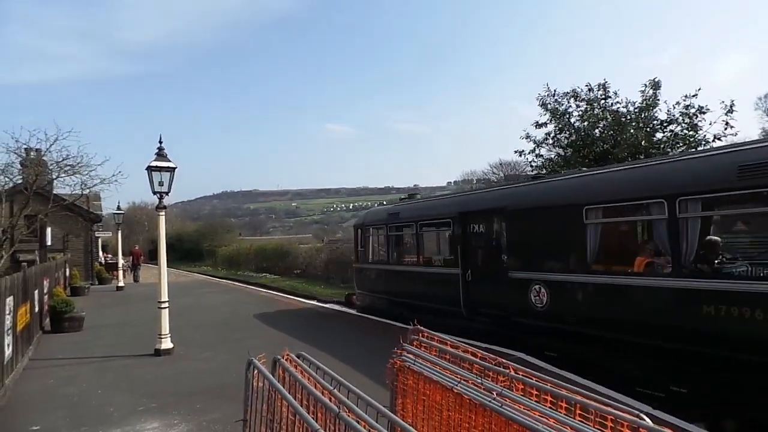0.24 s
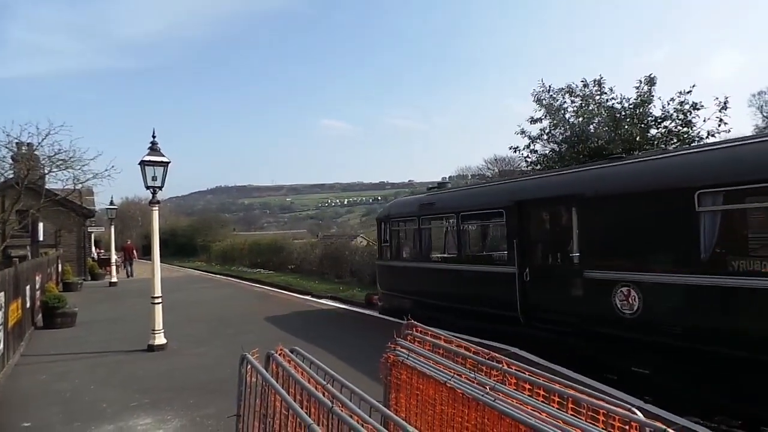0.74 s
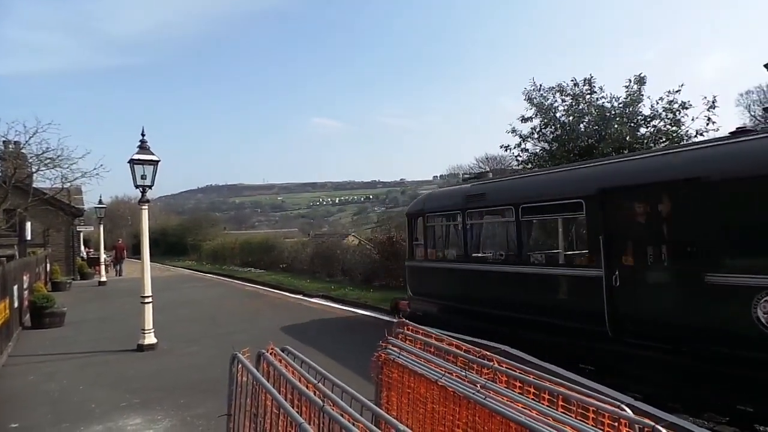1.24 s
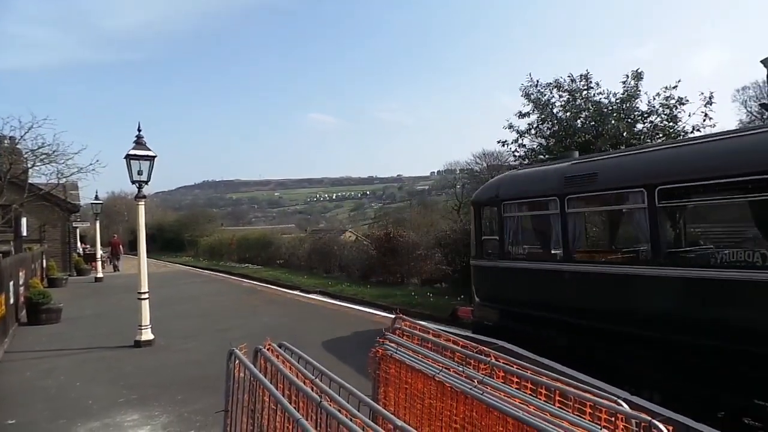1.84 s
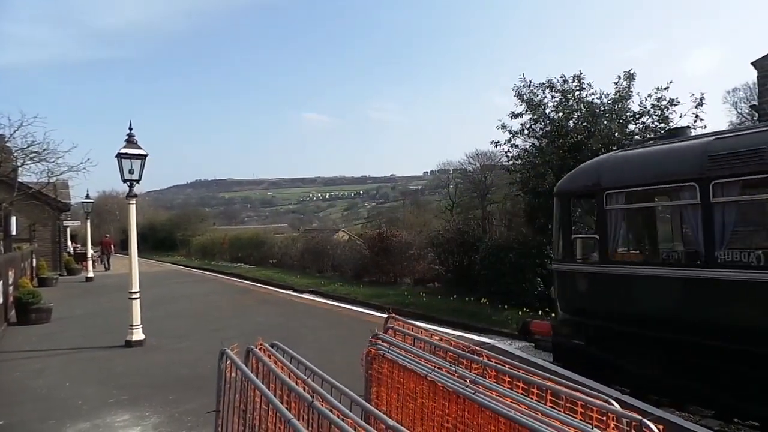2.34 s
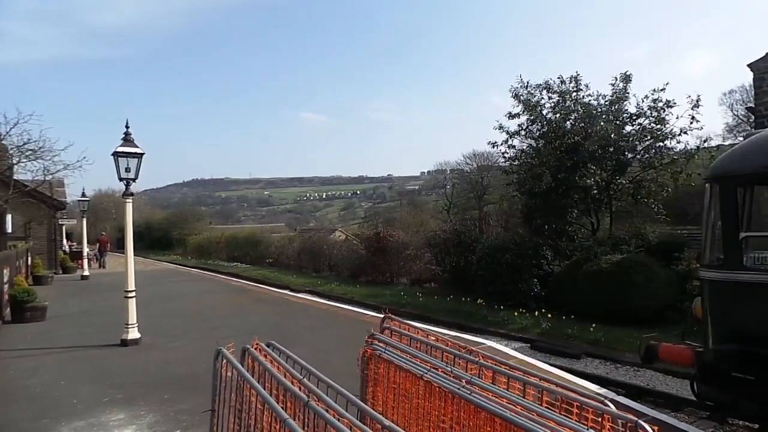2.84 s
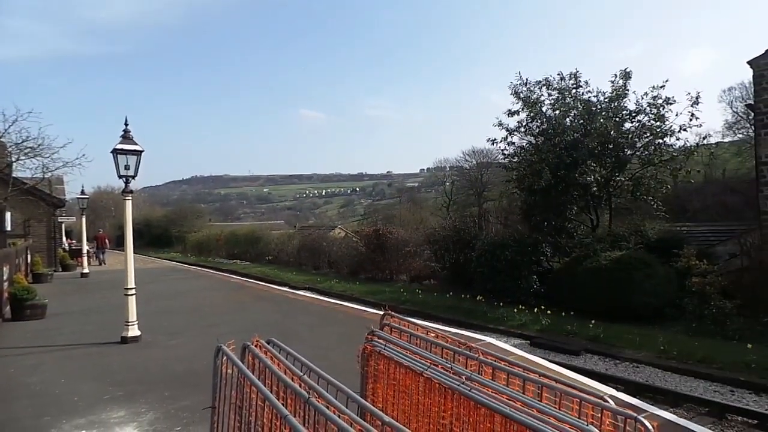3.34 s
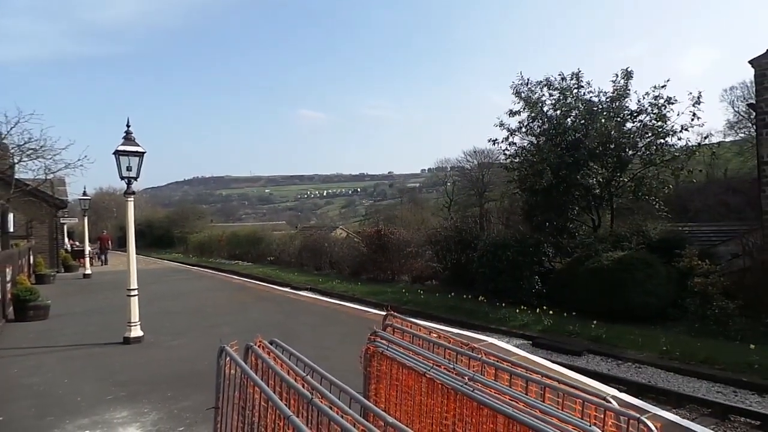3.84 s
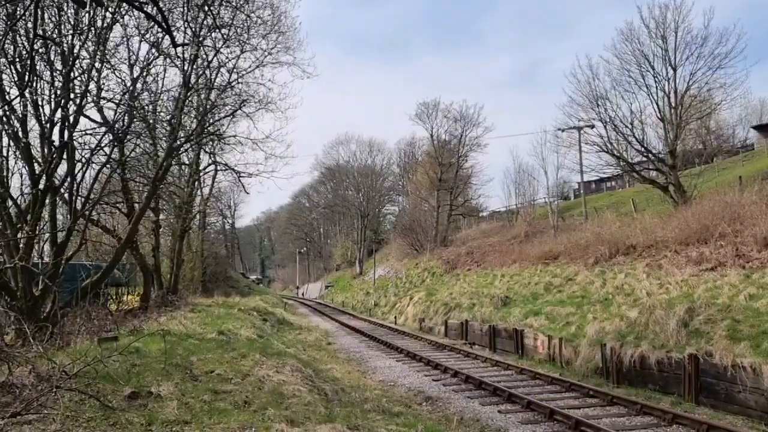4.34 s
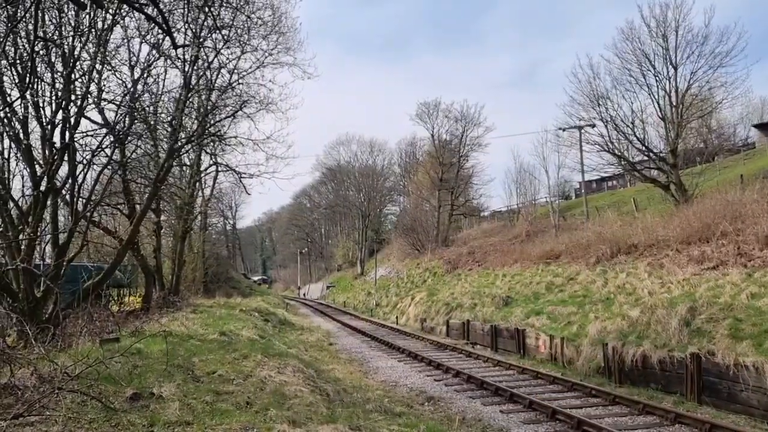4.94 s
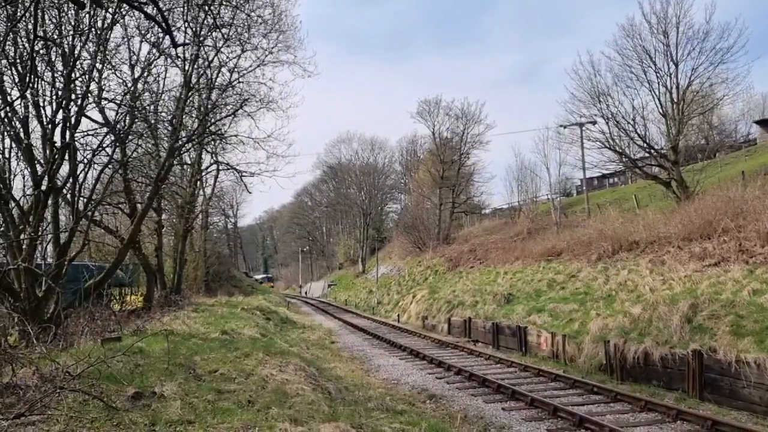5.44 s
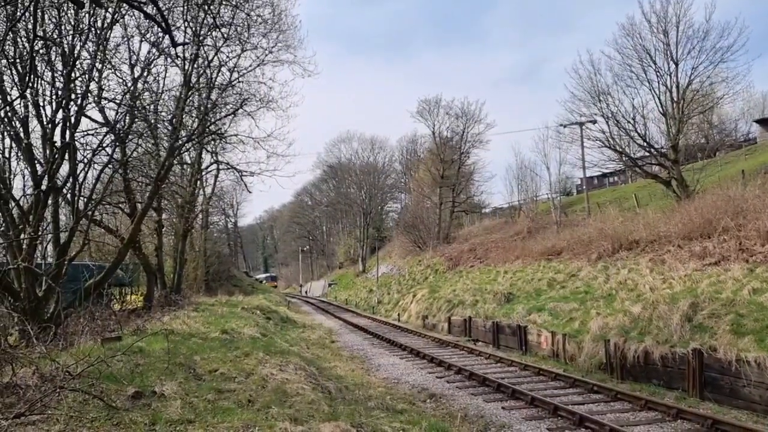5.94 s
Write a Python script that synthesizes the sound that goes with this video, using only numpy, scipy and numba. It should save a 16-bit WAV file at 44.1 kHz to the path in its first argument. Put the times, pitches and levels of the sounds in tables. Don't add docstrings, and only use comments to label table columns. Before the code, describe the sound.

From the start a diesel railcar is loud and close beside an open station platform. Deep exhaust thuds, about 45 per second, climb steadily to about 68 by 3.5 s, with knocking block resonances and rough, broad rolling noise. Joints and loose panels jolt irregularly; wheels ring around 700 Hz in short surges, strongest after 2.4 s. A blurred fan whine near 1.2 kHz peaks around 2 s. From 2.75 s a gear drone near 220 Hz joins, strongest around 3.4 s; roar peaks near 3.4 s and eases by 4 s. At 4.1 s the train cuts off. After a tiny gap comes a far quieter lineside: soft bassy breeze, faint throbbing engine hum, four high descending chirps until 4.7 s, a raspy far call at 4.3-4.5 s, and sparse echoing whistles until 6 s. Small snaps fall at 4.4 and 6 s, a dull knock at 5.5 s.

```python
import sys
import numpy as np
from scipy import signal
from scipy.fft import rfft, irfft
from scipy.io import wavfile
from scipy.ndimage import uniform_filter1d
from numba import njit

SR = 44100
rng = np.random.default_rng(int(sys.argv[2]) if len(sys.argv) > 2 else 0)


def master(y):
    cut = np.clip(np.atleast_2d(y).T, -1, 1)
    pcm = np.round(cut * 32767)
    wavfile.write(sys.argv[1], SR, pcm.astype(np.int16))


def convert_level_to_amplitude(level_db):
    exponent = np.asarray(level_db, float) / 20
    return 10 ** exponent


N = 273420
T = np.arange(N) / SR

# (fade out start [s], fade out end [s], fade in start [s], fade in end [s])
CUT_S = (4.108, 4.127, 4.149, 4.16)
# (frequency [Hz], density [dB per Hz])
AIR_SPECTRUM = [(15, -36), (25, -6), (48, 0), (76, 7), (113, -11.5), (160, -14.5), (257, -23.5), (326, -18),
                (569, -26), (741, -22), (1130, -32), (1330, -29.5), (2860, -34), (11300, -60.5),
                (14000, -82)]
# (time [s], level [dB])
BREEZE = [(4.17, -0.5), (4.9, -3), (5.2, -4), (5.45, 0.3), (5.9, 0.2), (6.2, -1.5)]
# (time [s], pitch [Hz], level [dB])
HUM = [(4.17, 53.84, -56), (4.3, 58, -47), (4.45, 64.4, -63), (4.58, 64.2, -48), (5.1, 65.9, -51),
       (5.25, 60.8, -61.5), (5.4, 61.1, -52), (5.6, 61.5, -57), (5.9, 63.6, -51), (6.06, 61.3, -59),
       (6.2, 74.6, -47)]
# (time [s], length [s], peak [dB])
CROAK = [
    (4.27, 0.16, -72.5),
    (4.335, .05, -65),
    (4.41, 0.057, -76),
    (4.54, .09, -70.5),
]
# (time [s], peak [dB], centre [Hz], width [Hz], decay [s])
SNAPS = [
    (4.158, -63, 2520, 400, .008),
    (4.3994, -57, 5100, 9000, .002),
    (5.485, -63, 1350, 260, 0.056),
    (5.9945, -61, 2596, 905, .004),
]
# (time [s], length [s], start [Hz], end [Hz], end level [dB])
CHIRPS = [
    (4.146, .066, 7500, 6380, -73),
    (4.284, 0.11, 7150, 6110, -64),
    (4.428, 0.13, 6950, 6050, -65),
    (4.599, 0.12, 7020, 6010, -67),
]
# (time [s], length [s], start [Hz], end [Hz], level [dB])
TICKS = [
    (5.142, .036, 7750, 6270, -73.5),
    (6, 0.059, 7720, 5900, -67.5),
]
# (time [s], length [s], start [Hz], end [Hz], level [dB])
WHISTLES = [(4.253, 0.043, 1660, 1600, -63), (4.341, .06, 1710, 1680, -70), (4.408, .11, 1700, 1604, -68),
            (4.555, .03, 1610, 1610, -65), (4.606, 0.054, 1990, 1910, -70), (4.655, .04, 1630, 1610, -71),
            (4.905, 0.077, 2080, 2440, -72), (4.967, 0.15, 2430, 2480, -69.5),
            (5.087, .13, 2380, 2450, -75), (5.33, 0.049, 2070, 2085, -70), (5.428, .05, 2700, 2610, -68),
            (5.616, .08, 2650, 2690, -73), (5.715, 0.049, 2295, 2250, -72), (5.79, 0.036, 2190, 2130, -61),
            (5.835, .035, 2150, 2150, -66), (5.865, 0.12, 2065, 2065, -71.5)]
# (time [s], centre [Hz], level [dB])
FAN = [(0, 1110, -45), (1, 1190, -33), (1.5, 1227, -26), (2, 1270, -24), (2.6, 1308, -26.5),
       (3, 1377, -33.5), (4.13, 1330, -40)]
# (time [s], level against the pass [dB], dullness [dB])
NEARNESS = [(0, -8, 3), (.3, -5, 0.5), (.55, -7, 1.5), (.9, -2.5, 1), (1.2, -2, 2), (1.8, -1, 2),
            (2.5, 0, 2.5), (3.35, 1, 3), (3.72, -1.5, 2.5), (3.9, -4, 3), (4.1, -6, 1.5)]
# (frequency [Hz], width [Hz])
WHEEL_MODES = [(731.4, 14), (678.5, 28)]
WHEEL_DB = [-30.5, -36]
# (time [s], length [s], peak [dB])
UPPER_RINGS = [(.44, 0.24, -37.5), (.73, 0.051, -24), (.84, .08, -27), (1.13, .14, -30), (1.4, .1, -26),
               (1.54, 0.051, -23), (1.64, 0.075, -24), (2.45, 0.14, -20.5), (2.55, 0.066, -31),
               (2.85, 0.25, -24.5), (3.03, 0.024, -30.5), (3.14, 0.18, -18), (3.3, 0.11, -42),
               (3.5, 0.1, -27), (3.6, 0.045, -21.5), (3.7, .12, -21)]
LOWER_RINGS = [(.73, 0.087, -35), (.87, 0.088, -38), (1.47, .2, -38), (2.0, 0.14, -41), (2.54, 0.097, -27),
               (2.9, 0.25, -38), (3.17, .12, -22.5), (3.42, 0.11, -26.5), (3.54, 0.05, -21.5),
               (3.62, 0.039, -24), (3.7, 0.062, -19), (3.85, 0.084, -25)]
# (frequency [Hz], width [Hz])
BLOCK_MODES = [(912, 90), (1876, 130), (756, 190), (338.4, 49), (1126, 140)]
BLOCK_DB = [-30.5, -33.5, -44, -32, -29.5]
# (time [s], length [s], peak [dB])
LOWER_SHUDDERS = [(.5, 0.083, -21.5), (.89, 0.28, -36), (1.28, 0.054, -33), (2.77, 0.082, -22),
                  (3.05, 0.14, -25.5), (3.36, 0.17, -18.5), (3.74, 0.16, -25.5)]
UPPER_SHUDDERS = [(1.33, 0.12, -25.5), (2.42, 0.37, -33.5), (3.05, 0.14, -32), (3.73, 0.14, -26.5)]
SUMP_SHUDDERS = [(.4, .6, -23.5), (.9, 0.57, -24.5), (3.6, .4, -31)]
FLOOR_SHUDDERS = [(1.9, 0.38, -28.5), (2.5, 0.44, -24), (2.95, 0.38, -21.5)]
AXLE_SHUDDERS = [(3.55, 0.23, -23.5), (3.7, 0.2, -32)]
# (frequency [Hz], density [dB per Hz])
ROAR_SPECTRUM = [(15, -42), (25, -21.5), (54, -11.5), (136, -4), (213, -4), (472, -11), (800, -9),
                 (1920, -17), (3100, -26.5), (8900, -34), (10200, -36), (11200, -36.5), (12500, -37.5),
                 (14400, -39)]
REGIONS_HZ = [420, 1100, 2300, 5500]
NEAR_SHARES = [0.54, 1.48, 1.06, 1.1]
DULL_SHARES = [1.1, 0.74, -0.025, -1.4]
# (time [s], length [s], treble lift [dB], bass lift [dB])
JOLTS = [(0.123, 0.037, 1, -5.5), (0.242, 0.082, 0.5, -1.5), (0.297, 0.044, -6, 0), (0.51, 0.11, 6, 0),
         (0.538, .04, -5, 1), (0.603, 0.076, 3, 1.5), (0.73, 0.017, 4.5, -2), (0.83, 0.064, 2.5, -1),
         (1.125, 0.07, -2.5, 0), (1.8, 0.035, 2.5, 1.5), (2.22, 0.11, 0.5, -0.5),
         (2.478, 0.022, -1.5, -4.5), (2.538, 0.013, 3, -2.5), (3.34, 0.041, -0.5, 1),
         (3.622, 0.025, 3.5, 0), (3.71, .05, 2, 2.5), (3.86, .03, 5.5, 0.5)]
# (time [s], pitch [Hz], level [dB])
GEAR = [(2.75, 213.5, -34), (3.0, 220.4, -26.5), (3.25, 226, -27), (3.4, 229.8, -20.5),
        (3.65, 232.3, -22.5), (3.9, 230.4, -25.5), (4.03, 222.4, -25.5), (4.1, 215.5, -38)]
# (time [s], length [s], peak [dB])
GEAR_UPPER = [
    (3.45, .5, -27.5),
]
# (time [s], firing rate [Hz], firing line level [dB], multiple favoured by echo, its lift [dB])
EXHAUST = [(0.0, 44.6, -17.5, 5.6, 9.5), (0.1, 46.5, -15.5, 5.6, 6), (0.25, 47.2, -15.5, 5.0, 9.5),
           (0.45, 48.73, -16, 4.3, 13), (0.72, 50.25, -19, 3.8, 19), (1.02, 52.56, -22.5, 3.3, 21.5),
           (1.24, 53.7, -19.5, 2.9, 19), (1.7, 57.2, -17.5, 2.4, 14.5), (2.0, 58.97, -16, 2.2, 8),
           (2.39, 61.53, -26, 2.1, 17.5), (2.8, 64.5, -32.5, 2.0, 22), (3.0, 65.1, -26.5, 2.0, 4.5),
           (3.38, 67.3, -28, 2.0, 12.5), (3.5, 68.0, -23.5, 2.0, 1.5), (3.85, 68.3, -32, 2.0, 1),
           (4.1, 65.0, -30, 2.0, 6)]
# (multiple of firing rate, index of line followed, level against it [dB])
UNEVEN_LINES = [(1.5, 1, -33.5), (2.5, 1, -15), (3.5, 2, -12), (4.5, 3, -6.5), (5.5, 4, -6.5), (6, 4, -8),
                (6.5, 4, -26.5), (7, 4, -17)]
# (time [s], length [s], share)
SCRAP_SWELLS = [
    (1.3, .4, .04),
    (1.9, .8, .06),
    (2.55, .6, .08),
    (3.62, .1, .1),
]


def level(x, db):
    return x * convert_level_to_amplitude(db) / np.sqrt(np.mean(x ** 2))


def curves(table):
    s, *columns = np.transpose(table)
    return [np.interp(T, s, c) for c in columns]


def swells(rows):
    return sum(h * np.exp(-(2 * (T - s) / length) ** 2) for s, length, h in rows)


def sung(rows):
    return swells([(s, length, convert_level_to_amplitude(db)) for s, length, db in rows])


def walk(rate_hz):
    k = int(SR / rate_hz)
    held = np.repeat(rng.standard_normal(N // k + 1), k)
    return 0.95 * uniform_filter1d(uniform_filter1d(held, k), k)[:N]


def glide(hz):
    return 2 * np.pi * np.cumsum(hz) / SR


@njit
def svf(x, hz, width):
    y, b, l = np.empty(len(x)), 0., 0.
    for i in range(len(x)):
        g, k = np.tan(np.pi * hz[i] / SR), width / hz[i]
        v = (b + g * (x[i] - l)) / (1 + g * (g + k))
        b, l, y[i] = 2 * v - b, l + 2 * g * v, k * v
    return y


def band(hz, width_hz):
    centre = hz + np.zeros(N)
    once = svf(rng.standard_normal(N), centre, 1. * width_hz)
    return level(svf(once, centre, 1. * width_hz), 0)


def tone(hz, width_hz):
    pure = 0.8
    line = np.sqrt(2) * np.sin(glide(hz + width_hz / 3 * walk(30)))
    return level(pure * line + (1 - pure ** 2) ** .5 * band(hz, width_hz), 0)


def bands(spectrum):
    f = np.maximum(np.fft.rfftfreq(N, 1 / SR), 1)
    hz, db = np.transpose(spectrum)
    colour_db = np.interp(np.log(f), np.log(hz), db, left=-120)
    coloured = rfft(rng.standard_normal(N)) * convert_level_to_amplitude(colour_db)
    for centre in 25 * 2 ** (np.arange(29) / 3):
        share = np.clip(1 - np.abs(3 * np.log2(f / centre)), 0, 1)
        yield centre, irfft(coloured * share, N)


def air():
    breeze_db = curves(BREEZE)[0]
    out = 0
    for hz, noise in bands(AIR_SPECTRUM):
        if hz > 90:
            share = 1 if hz < 1000 else .4
            out = out + convert_level_to_amplitude(breeze_db * share + 1.3 * walk(5.5)) * noise
    return out * convert_level_to_amplitude(-58) / out[-2 * SR:].std()


def far_hum():
    hz, db = curves(HUM)
    drone = np.sqrt(2) * convert_level_to_amplitude(db + 2.5 * walk(20)) * np.sin(glide(hz))
    overtone = convert_level_to_amplitude(-67 + 5 * walk(20)) * band(160, 17)
    murmur = convert_level_to_amplitude(-54) * band(61.0, 40) + convert_level_to_amplitude(-90.0) * band(398, 17) + convert_level_to_amplitude(-71.5) * band(757, 40)
    return drone + murmur + overtone


def snaps():
    out = 0
    for s, db, hz, width_hz, decay_s in SNAPS:
        out = out + convert_level_to_amplitude(db) * (T > s) * np.exp(-np.abs(T - s) / decay_s) * band(hz, width_hz)
    return out


def lineside():
    return air() + far_hum() + sung(CROAK) * band(1327, 70) + snaps()


def note(row, rough, bend):
    s, length, start_hz, end_hz, db = row
    age = np.clip(T - s, 0, length)
    done, change_db = bend(age, length)
    edge = np.clip(np.minimum(age, length - age) / 0.02, 0, 1)
    hz = start_hz + (end_hz - start_hz) * done
    gain = edge * convert_level_to_amplitude(db + change_db + rough * walk(65))
    return np.sqrt(2) * gain * np.sin(glide(hz * (1 + .004 * rough * walk(80))))


def chirp_bend(age, length):
    settle = np.exp(-age / .024)
    flick = 1.5 * np.exp(-age / .005)
    sag = .15 * np.exp((age - length) / 0.007)
    return 1 - settle + flick + sag, -7 * settle


def tick_bend(age, length):
    return (age / length) ** 1.6, 0


def whistle_bend(age, length):
    return age / length, 0


def birds():
    near = sum(note(n, 1.55, chirp_bend) for n in CHIRPS)
    ticks = sum(note(n, 1.9, tick_bend) for n in TICKS)
    far = sum(note(n, 3.0, whistle_bend) for n in WHISTLES)
    tail_s = np.arange(SR // 2) / SR
    trees = rng.standard_normal(len(tail_s)) * np.exp(-tail_s / 0.051) * np.clip(tail_s / .02, 0, 1)
    sent = convert_level_to_amplitude(-50) * near + convert_level_to_amplitude(-34) * ticks + convert_level_to_amplitude(-36) * far
    return near + ticks + far + signal.fftconvolve(sent, trees)[:N]


def chop(phase, times_s, depths):
    return 1 + np.interp(T, times_s, depths) * np.cos(phase + 1.0)


def ringing(steady_db, sing_tables, modes, source):
    near_db = curves(NEARNESS)[0]
    out = 0
    for db, rows, (hz, width_hz) in zip(steady_db, sing_tables, modes):
        out = out + (convert_level_to_amplitude(db + near_db) + sung(rows)) * source(hz, width_hz)
    return out


def wheel_rings(phase):
    wheel = ringing(WHEEL_DB, (UPPER_RINGS, LOWER_RINGS), WHEEL_MODES, tone)
    return convert_level_to_amplitude(-2.0) * wheel * chop(phase, [0, 2, 2.4], [.4, .35, .05])


def block_rings(phase):
    shudders = (LOWER_SHUDDERS, UPPER_SHUDDERS, SUMP_SHUDDERS, FLOOR_SHUDDERS, AXLE_SHUDDERS)
    block = ringing(BLOCK_DB, shudders, BLOCK_MODES, band)
    return convert_level_to_amplitude(-6.0) * block * chop(phase, [0, 1.2, 2.4], [.35, .3, .05])


def fan(phase):
    hz, db = curves(FAN)
    return convert_level_to_amplitude(db) * band(hz, 220) * (1 + .4 * np.cos(phase + 1.0))


def squeak():
    near_db = curves(NEARNESS)[0]
    return convert_level_to_amplitude(1.3 * near_db - 49.5 + 3 * walk(20)) * band(5320, 180)


def gear():
    hz, db = curves(GEAR)
    phase = glide(hz * (1 + 0.002 * walk(15)))
    fade = np.clip((T - GEAR[0][0]) / 0.12, 0, 1)
    lower = convert_level_to_amplitude(db) * np.sin(phase)
    upper = (sung(GEAR_UPPER) + convert_level_to_amplitude(-38.5)) * np.sin(phase * 4 / 3)
    return np.sqrt(2) * fade * (lower + upper)


def rolling(phase):
    near_db, dull_db = curves(NEARNESS)
    treble_db = swells([(s, length, treble) for s, length, treble, _ in JOLTS])
    bass_db = swells([(s, length, bass) for s, length, _, bass in JOLTS])
    swell_db = np.outer(NEAR_SHARES, near_db) + np.outer(DULL_SHARES, dull_db)
    swell_db += np.array([bass_db, bass_db, treble_db, treble_db])
    swell_db -= swell_db[:, :int(4 * SR)].mean(axis=1, keepdims=True)
    near = np.interp(T, [0, 1.5, 3], [.4, .3, .08])
    knock = 1 + near * np.cos(phase + 1.0) + 0.21 * near * np.cos(phase / 2)
    shake_db = 0.47 * walk(3.5) + 1.2 * walk(25)
    out = 0
    for hz, noise in bands(ROAR_SPECTRUM):
        place = np.interp(np.log(hz), np.log(REGIONS_HZ), np.arange(4))
        low = min(int(place), 2)
        db = swell_db[low] + (place - low) * (swell_db[low + 1] - swell_db[low])
        db = db + min(hz / 3000., 1) * 0.61 * shake_db + 1.1 * walk(14)
        knock_share = np.exp(-np.log(hz / 980.0) ** 2 / 0.67)
        out = out + convert_level_to_amplitude(db) * noise * knock ** knock_share
    return level(out, -20.0)


def exhaust():
    hz, first_db, favoured, lift_db = curves(EXHAUST)
    lift_db = lift_db + 1.6 * walk(22)
    lines_db = [first_db]
    for multiple in range(2, 6):
        octaves = np.log2(multiple / favoured)
        spread = np.where(octaves > 0, 0.87, 0.64)
        lift = lift_db * np.exp(-(octaves / spread) ** 2)
        hole = 5.5 * np.exp(-((octaves + 1) / .32) ** 2)
        lines_db.append(first_db - 7.5 * np.log2(multiple) + lift - hole)
    phase = 2.45 + glide(hz * (1 + 0.0035 * walk(20)))
    thud = 0
    for multiple, followed, below_db in [(k + 1, k, 0) for k in range(5)] + UNEVEN_LINES:
        lag = -0.7 if multiple == 2 else -1.9
        gain = convert_level_to_amplitude(lines_db[followed] + below_db + 1.4 * walk(11))
        thud = thud + gain * np.cos(multiple * phase + lag)
    return np.sqrt(2) * thud, phase


def thin_treble(x):
    f, t, cells = signal.stft(x, SR, nperseg=1024)
    f_hz = f[:, None]
    scraps = np.interp(t, T, .008 + swells(SCRAP_SWELLS))
    over_hz = f_hz - np.interp(t, [1.3, 2.7], [10800, 9900])
    chance = 1 / (1 + np.exp(over_hz / 450)) + scraps * np.clip((14500 - f_hz) / 3000, 0, 1)
    draw = rng.random((len(f) // 2 + 1, len(t) // 3 + 1))
    draw = np.kron(draw, np.ones((2, 3)))[:len(f), :len(t)]
    return signal.istft(cells * (draw < chance), SR, nperseg=1024)[1][:N]


def scene():
    quiet = lineside() + birds()
    thud, phase = exhaust()
    rings = wheel_rings(phase) + block_rings(phase) + fan(phase) + squeak()
    train = thud + gear() + rolling(phase) + rings
    train = thin_treble(np.tanh(0.69 * train) / 0.72)
    out_gain = np.interp(T, CUT_S[:2], [1, 0])
    in_gain = np.interp(T, CUT_S[2:], [0, 1])
    return (train * out_gain + quiet * in_gain)[None]


def roll_off(x):
    return signal.sosfilt(signal.butter(12, 14290, fs=SR, output="sos"), x)


def record(dry):
    return roll_off(dry)


dry = scene()
out = record(dry)
master(out)
```